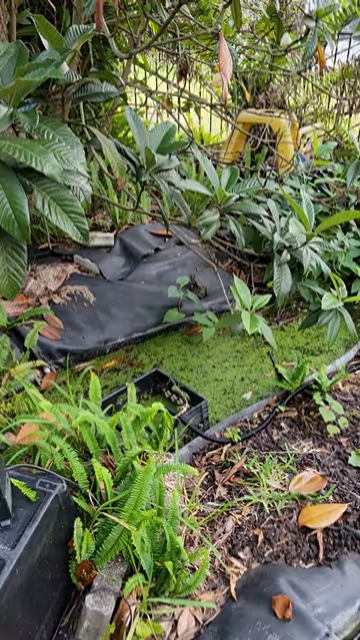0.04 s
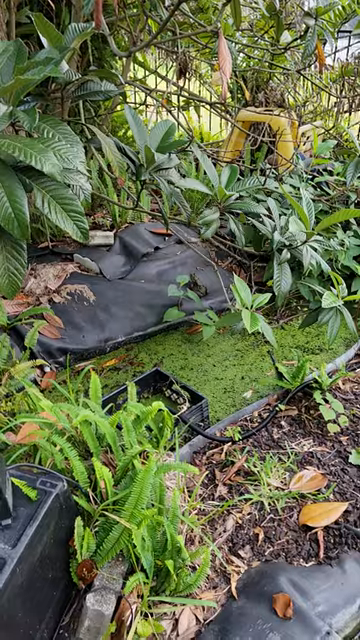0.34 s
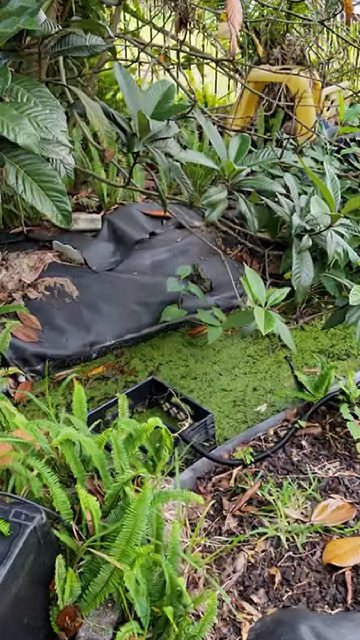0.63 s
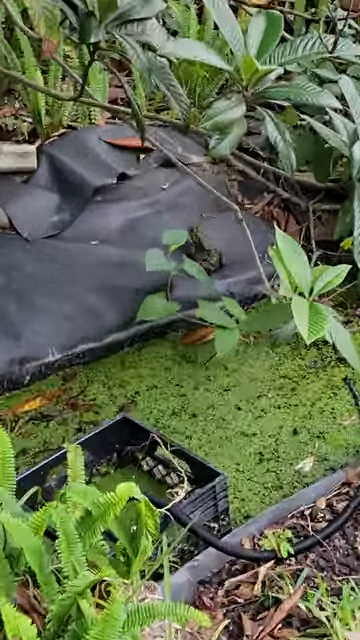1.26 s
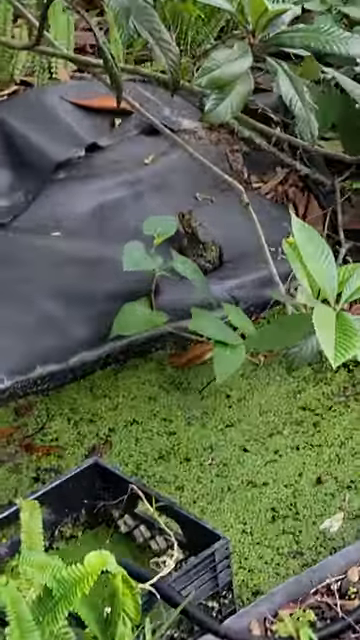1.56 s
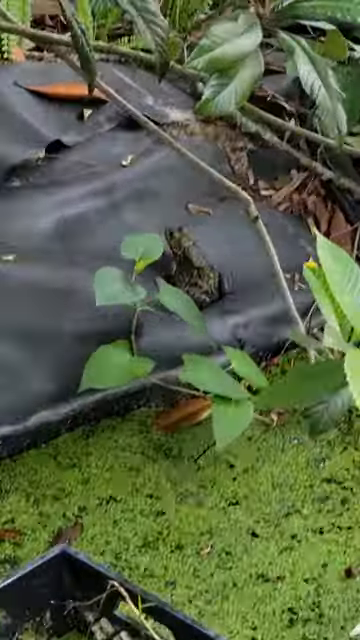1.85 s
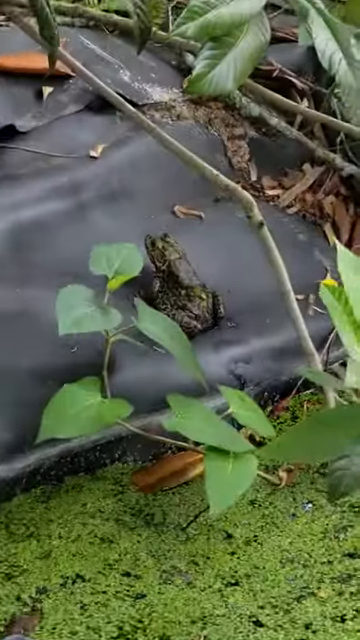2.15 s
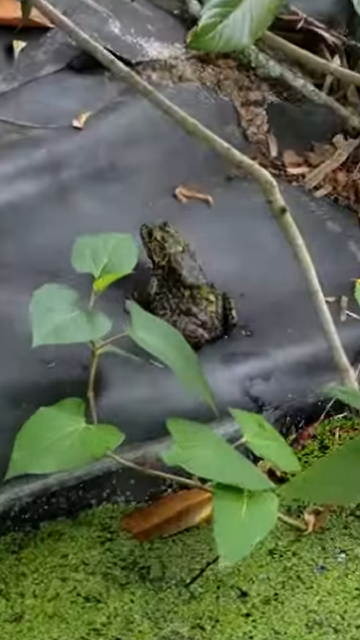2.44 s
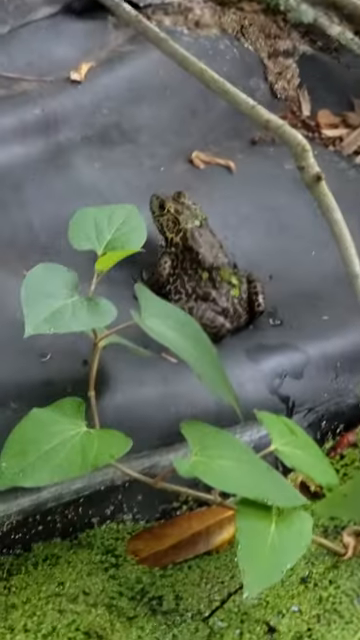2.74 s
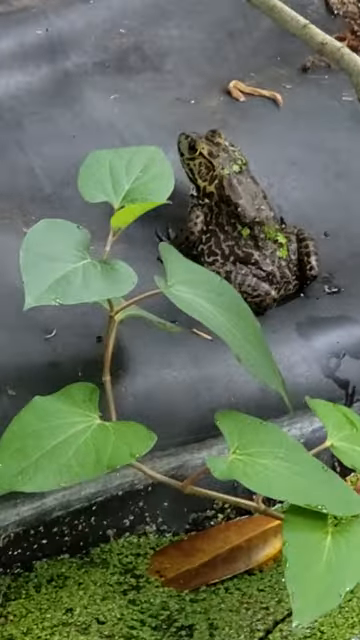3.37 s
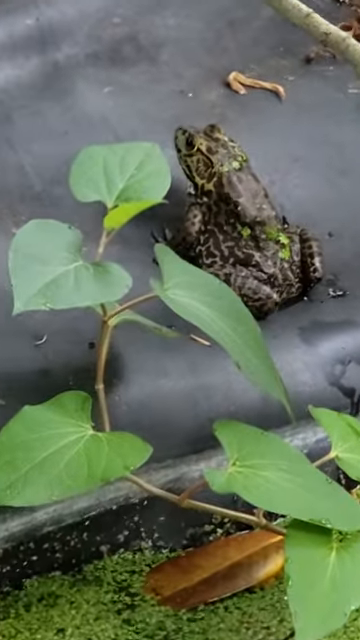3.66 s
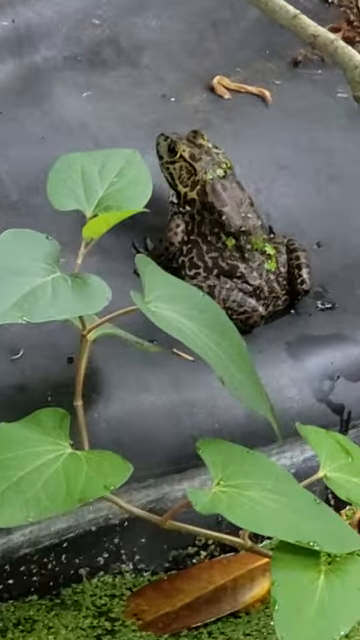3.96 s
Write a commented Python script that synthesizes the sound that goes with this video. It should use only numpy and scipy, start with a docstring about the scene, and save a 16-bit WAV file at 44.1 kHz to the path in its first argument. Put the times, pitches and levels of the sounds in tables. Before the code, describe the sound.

A steady trickle of water splashing and bubbling into a pond over a faint hum.

```python
"""Water trickles into a garden pond, heard while walking slowly closer.
Each drop splashes and traps an air bubble, which rings like a tiny bell. A plastic box and the
pond liner colour and scatter the sound, and drops rap on the box. Runs of small bubbles, spray
ticks, loud plinks and rising gurgles stand out over a pump's hum and a distant motor's drone."""
import sys
import numpy as np
from scipy import signal
from scipy.fft import rfft, irfft
from scipy.io import wavfile
from scipy.ndimage import uniform_filter1d

SR = 44100
rng = np.random.default_rng(int(sys.argv[2]) if len(sys.argv) > 2 else 0)


def int16_out(signal):
    """Quantize to a 16-bit WAV file."""
    q = np.round(np.clip(np.atleast_2d(signal).T, -1, 1) * 32767)
    wavfile.write(sys.argv[1], SR, q.astype(np.int16))


N = 176400

# How loud the water is while walking closer: time_s, bubbles_db, splashes_db, raps_db
NEARNESS = [(0, -54.5, -56.5, -56), (.25, -52.5, -53.5, -58), (.45, -58, -56, -57),
            (1.05, -51.5, -53.5, -63), (1.35, -51.5, -51.5, -51.5), (1.6, -52, -51.5, -57),
            (2.3, -51.5, -51.5, -51.5), (2.85, -46, -49, -56.5), (3.08, -54.5, -51.5, -53.5),
            (3.45, -48.5, -48.5, -52.5), (4, -49, -50.5, -51.5)]
# How wide splashes and raps sound (higher is wider): pitch_hz, width_db
SPLASH_WIDTH = [(300, 7.5), (1300, -21), (2000, -37), (3500, -9), (5500, 0.5), (8000, 0), (16000, 4)]


def undb(db):
    """Turn decibels into a number to multiply by."""
    return 10 ** (np.asarray(db) / 20)


def unit(x):
    """Scale a sound so its average power is 1."""
    return x / np.sqrt(np.mean(x ** 2))


def curve(rows, column=1):
    """Loudness over time, from one decibel column of a table."""
    rows = np.array(rows)
    return undb(np.interp(np.arange(N) / SR, rows[:, 0], rows[:, column]))


def wander(hz):
    """A smooth random drift, mostly between -1 and 1, with hz steps a second."""
    hold = int(SR / hz)
    steps = rng.standard_normal(512)[np.arange(N) // hold]
    return 1.3 * uniform_filter1d(uniform_filter1d(steps, hold), hold)


def colour(x, points):
    """Make some pitches louder and others softer, following (pitch_hz, gain_db) points."""
    hz, db = np.array(points).T
    freqs = np.arange(N + 1) * SR / (2 * N) + 1
    log_filter = irfft(np.log(undb(np.interp(np.log(freqs), np.log(hz), db))))
    log_filter[1:N] *= 2  # fold it so it rings only after a sound, never before
    log_filter[N + 1:] = 0
    return irfft(rfft(x, 2 * N) * np.exp(rfft(log_filter)))[..., :N]


def wide_noise(widths):
    """Stereo noise: one part is the same in both ears, the other is opposite."""
    a, b = rng.standard_normal((2, N))
    same = colour(a, [(hz, -10 * np.log10(1 + undb(2 * db))) for hz, db in widths])
    opposite = colour(b, [(hz, -10 * np.log10(1 + undb(-2 * db))) for hz, db in widths])
    return same + np.array([[1], [-1]]) * opposite


def add(out, start_s, sound):
    """Mix a short sound into a longer one."""
    i = int(np.clip(start_s * SR, 0, N - 1))
    out[..., i:i + sound.shape[-1]] += sound[..., :N - i]


def strength(chance, spread_db, limit):
    """Turn random numbers from 0 to 1 into drop strengths, at most limit times spread_db."""
    return undb(spread_db * np.minimum(-np.log(chance), limit))


def scatter(x, db=-7, decay_s=.014, width=.8):
    """Add quick echoes from the box and liner; width says how much the two ears differ."""
    t = np.arange(SR // 10) / SR
    noise = rng.standard_normal((3, len(t)))
    tail = (width * noise[:2] + np.sqrt(1 - width ** 2) * noise[2]) * np.exp(-t / decay_s)
    tail *= undb(db) / np.sqrt(np.sum(tail ** 2, axis=1, keepdims=True))
    tail[:, 0] = 1  # the direct sound
    return signal.fftconvolve(x * np.ones((2, 1)), tail, axes=1)


def bubble(hz, cycles, attack_s, rise=.0325):
    """A trapped bubble rings and fades, rising in pitch as it nears the surface."""
    life_s = cycles / hz
    t = np.arange(int(5 * life_s * SR)) / SR
    ring = np.sin(2 * np.pi * hz * (t + rise * t * t / life_s / 2))
    return ring * np.exp(-t / life_s) * (1 - np.exp(-(t / attack_s) ** 2))


def bubbles(drops, spot_count=14, low_hz=282.8, high_hz=6538):
    """Drops trap bubbles at several spots; small, high ones are the most common."""
    # How the box colours the bubbles: pitch_hz, gain_db
    box_tone = [(150, -26.5), (260, -12.5), (345, 11), (460, -4), (650, 3.5), (850, -15), (1150, -10.5),
                (1480, -16.5), (1720, -7.5), (1930, -1.5), (2200, -5.5), (2480, -12), (2790, -3.5),
                (3050, -4), (3330, -1.5), (3600, -12), (4150, -1.5), (4750, -19), (6200, -6), (8000, -28),
                (16000, -74)]
    spots = np.zeros((spot_count, N))
    for k, (when, chance, pitch, life, rise) in enumerate(drops):
        hz = low_hz * (high_hz / low_hz) ** (pitch ** .52)
        gain = strength(chance, spread_db=1.5, limit=5.6) * (hz / low_hz) ** .96
        ring = bubble(hz, cycles=8.93 * (.5 + life), attack_s=.00097, rise=.13 * rise)
        add(spots[k % spot_count], when * N / SR, gain * ring)
    return unit(colour(sum(scatter(spot, db=0, decay_s=.005) for spot in spots), box_tone))


def splashes(drops, crack_s=.00022, tail_s=.0094):
    """Each drop hits the water with a sharp crack and a short tail of spray."""
    # The colour of the splashes: pitch_hz, gain_db
    splash_tone = [(150, -22), (350, -18.5), (650, 7.5), (1480, -15), (1950, 2), (4100, -3.5), (4750, 4),
                   (6200, 4.5), (7350, -3.5), (8500, -4), (10000, -4.5), (12300, 2.5), (16000, -12)]
    sizes = strength(drops[:, 1], spread_db=4.4, limit=3.6)
    power = np.bincount((drops[:, 0] * N).astype(int), sizes ** 2, N)
    t = np.arange(SR // 10) / SR
    fade = np.exp(-t / crack_s) + undb(-.5) * np.exp(-t / tail_s)
    loudness = np.sqrt(np.abs(signal.fftconvolve(power, fade ** 2)[:N]))
    return unit(colour(loudness * wide_noise(SPLASH_WIDTH), splash_tone))


def fizz(spot_count=10, per_s=2300, low_hz=3450, high_hz=14980):
    """Fine droplets thrown up by the stream fall back as tiny high pings."""
    # The colour of the finest droplets: pitch_hz, gain_db
    fizz_tone = [(2500, 1), (4100, -0.5), (4750, -4), (6200, 1), (7350, 5), (8300, -14.5), (10000, -6.5),
                 (12300, 2.5), (16000, 10.5)]
    spots = np.zeros((spot_count, N))
    for k, (when, chance, pitch) in enumerate(rng.random((16384, 3))[:int(per_s * N / SR)]):
        hz = low_hz * (high_hz / low_hz) ** pitch
        ping = strength(chance, spread_db=3.2, limit=3.6) * bubble(hz, cycles=8, attack_s=1 / hz)
        add(spots[k % spot_count], when * N / SR, ping)
    return unit(colour(sum(scatter(spot, db=2, decay_s=.006, width=.85) for spot in spots), fizz_tone))


def trickle(drops_per_s=520, surge_db=1):
    """A surging stream of drops, each with a splash and a bubble, and its fine spray."""
    drops = rng.random((8192, 5))[:int(drops_per_s * N / SR)]
    ringing = bubbles(drops) * curve(NEARNESS, column=1)
    spatter = (splashes(drops) + undb(-2.5) * fizz()) * curve(NEARNESS, column=2)
    return (ringing + spatter) * undb(surge_db * wander(hz=26))


def rap_box(power, fade_s=.0072):
    """Drops break up in a few milliseconds and ring all the box's notes at once."""
    # The notes the box rings at: pitch_hz, width_hz, gain_db
    box_notes = [(349, 24, 6.5), (660, 420, 0), (1943, 253, 6), (2860, 300, 5), (3317, 135, 2.5),
                 (3930, 700, 1)]
    freqs = np.fft.rfftfreq(N, 1 / SR) + 1
    body = sum(undb(db) / (1 + 1j * (freqs - hz * hz / freqs) / width) ** 2
               for hz, width, db in box_notes)
    t = np.arange(SR // 10) / SR
    loudness = np.sqrt(np.abs(signal.fftconvolve(power, np.exp(-2 * t / fade_s))[:N]))
    bursts = loudness * unit(wide_noise(SPLASH_WIDTH))
    return irfft(rfft(bursts) * body) / np.sqrt(np.mean(np.abs(body) ** 2))


def patter(raps_per_s=200):
    """Drops rap on the box all the time, a few of them heavily."""
    # Heavy drops on the box: start_s, level_db
    heavy_drops = [(.238, -48), (0.25, -39), (0.266, -47), (0.299, -35.5), (0.324, -34.5), (0.692, -35.5),
                   (1.027, -43), (1.403, -35.5), (1.672, -34.5), (1.968, -35.5), (2.862, -33.5),
                   (3.395, -32.5), (3.412, -30), (3.516, -32), (3.696, -32), (3.795, -29.5), (3.894, -35)]
    when, chance = rng.random((4096, 2))[:int(raps_per_s * N / SR)].T
    light = np.bincount((when * N).astype(int), strength(chance, spread_db=9.5, limit=1.07) ** 2, N)
    start_s, db = np.array(heavy_drops).T
    heavy = np.bincount((start_s * SR).astype(int), undb(db - 7) ** 2, N)
    return unit(rap_box(light)) * curve(NEARNESS, column=3) + rap_box(heavy)


def motor_tone(hz):
    """One slightly unsteady tone of a running motor."""
    t = np.arange(N) / SR
    return np.sqrt(2) * np.sin(2 * np.pi * (hz * t + rng.random()) + .19 * wander(hz=3.85))


def pump_hum(waver_db=2, growth_db_per_s=1.5):
    """Mains electricity makes the pump hum; the hum wavers and slowly gets louder."""
    # The tones in the hum: pitch_hz, level_db
    hum_tones = [(120, -58.5), (180, -64.5), (300, -74), (360, -64), (420, -67), (533, -72)]
    t = np.arange(N) / SR
    hum = sum(motor_tone(hz) * undb(db + waver_db * wander(hz=5.38)) for hz, db in hum_tones)
    return hum * undb(growth_db_per_s * (t - t.mean()))


def distant_drone(throb_db=1.2):
    """A far-off motor holds one low, throbbing note that grows louder."""
    # How loud the drone is: time_s, level_db
    drone_levels = [(0, -62.5), (1.6, -57.5), (2.3, -52), (2.8, -47), (3.2, -47.5), (4, -43.5)]
    return motor_tone(hz=84.4) * curve(drone_levels) * undb(throb_db * wander(hz=11))


def outdoor_air():
    """Low outdoor rumble with a faint hiss above it."""
    # The colour of the air: pitch_hz, gain_db
    air_tone = [(10, -23), (20, -31), (28, -16), (42, -3), (57, -2), (75, -1.5), (100, -7.5), (128, -7.5),
                (155, -11.5), (240, -16.5), (350, -13), (480, -20.5), (700, -17), (1400, -24), (4000, -22),
                (9000, -45.5), (16000, -51)]
    # How loud it is: time_s, level_db
    air_levels = [(.4, -52.5), (.9, -52), (2, -48), (4, -47)]
    # How wide it sounds: pitch_hz, width_db
    air_width = [(30, -13), (90, -13.5), (200, -18), (500, -3.5), (1500, 2.5), (16000, 12)]
    return unit(colour(wide_noise(air_width), air_tone)) * curve(air_levels)


def bubble_runs(per_s=330, spread_octaves=.075, spread_db=5):
    """A pocket of air breaks into a thick run of overlapping bubbles."""
    # Runs of small bubbles of similar size: start_s, length_s, pitch_hz, level_db
    runs = [(0.174, 0.097, 2680, -57), (.18, .1, 4190, -55.5), (0.582, 0.25, 4100, -57),
            (0.933, 0.18, 4030, -57), (1.85, 0.048, 2880, -55), (3.851, 0.055, 3080, -44.5)]
    out = np.zeros((2, N))
    for start_s, length_s, centre_hz, db in runs:
        run = np.zeros(SR // 2)
        pitches = centre_hz * 2 ** (spread_octaves * rng.standard_normal(512))
        delays = rng.random(512)
        sizes = undb(spread_db * rng.standard_normal(512))
        for k, hz in enumerate(pitches[:int(length_s * per_s)]):
            add(run, (k + delays[k]) / per_s, sizes[k] * bubble(hz, cycles=7, attack_s=1 / hz))
        run *= undb(db) / np.sqrt(np.sum(run ** 2) / (length_s * SR))
        add(out, start_s, scatter(run))
    return out


def ticks(fade_s=.0051, width_octaves=.35):
    """Stray droplets land with a sharp tick."""
    # Landing droplets: start_s, level_db, pitch_hz
    droplets = [(0.2513, -37.5, 11800), (.355, -42, 10500), (.79, -45, 6400), (.848, -49, 12000),
                (.955, -43.5, 12500), (.999, -42, 12000), (1.028, -36, 5440), (1.335, -41, 7000),
                (1.7885, -35.5, 9100), (2.166, -37.5, 5970), (2.305, -38.5, 654), (2.394, -36.5, 6860),
                (2.433, -37, 5330), (2.538, -39.5, 12500), (3.494, -38, 1460), (3.775, -35.5, 5700),
                (3.964, -36, 6850)]
    out, t = np.zeros((2, N)), np.arange(SR // 10) / SR
    freqs = np.fft.rfftfreq(len(t), 1 / SR) + 1
    for start_s, db, hz in droplets:
        band = 1 / (1 + (np.log2(freqs / hz) / width_octaves) ** 2)
        hiss = unit(irfft(rfft(rng.standard_normal((2, len(t)))) * band))
        add(out, start_s, undb(db - .5) * hiss * np.exp(-t / fade_s))
    return out


def plinks(cycles=8, rise=.01, roughness=.35):
    """Single loud bubbles swell as they pinch off and die quickly, roughened by churning water."""
    # Loud bubbles: peak_s, pitch_hz, level_db
    loud_bubbles = [(.267, 4070, -34), (.267, 2760, -35.5), (.298, 644, -44), (.327, 2900, -39.5),
                    (.552, 4060, -32), (.621, 4430, -40), (.768, 4100, -36), (0.844, 4150, -39),
                    (.943, 4050, -39), (1.073, 4340, -43), (1.003, 620, -43), (1.382, 3320, -34.5),
                    (1.405, 642, -39), (1.811, 3420, -36.5), (1.8735, 1986, -25.5), (1.8765, 2780, -21.5),
                    (2.123, 4000, -37), (2.197, 3420, -35.5), (2.309, 324, -37), (2.55, 2034, -34),
                    (2.55, 3840, -30), (2.898, 3870, -33), (3.141, 1884, -31.5), (3.402, 1880, -35.5),
                    (3.416, 3800, -33), (3.652, 4080, -32.5), (3.697, 1985, -38), (3.791, 3320, -27.5),
                    (3.7915, 4100, -29.5), (3.833, 4170, -31), (3.859, 3140, -32), (3.882, 2980, -32.5),
                    (3.902, 1843, -33.5)]
    out, t = np.zeros((2, N)), np.arange(-SR // 50, SR // 20) / SR
    for peak_s, hz, db in loud_bubbles:
        life_s = min(cycles / hz, .007)
        ring = np.sin(2 * np.pi * hz * (t + rise * t * t / life_s / 2))
        ring *= np.exp(np.minimum(2 * t, -t) / life_s)  # swells twice as fast as it fades
        churn = unit(uniform_filter1d(rng.standard_normal(len(t)), int(2 * SR / hz)))
        add(out, peak_s + t[0], undb(db - 1) * scatter(ring * (1 + roughness * churn)))
    return out


def gurgles(roughness=.7, grain_s=.001):
    """Short, rough tones slide upward as a hollow in the water closes."""
    # Rising gurgles: start_s, length_s, start_hz, end_hz, level_db
    slides = [(0.376, 0.023, 1084, 1310, -55.5), (1.326, 0.019, 710, 1100, -51.5),
              (1.632, 0.0248, 1083, 1910, -47), (1.831, 0.03, 730, 1030, -47),
              (1.835, 0.012, 1490, 1850, -49), (2.495, 0.023, 870, 936, -50.5),
              (2.793, 0.018, 1550, 1690, -47.5)]
    out = np.zeros((2, N))
    for start_s, length_s, start_hz, end_hz, db in slides:
        progress = np.linspace(0, 1, int(length_s * SR))
        hz = start_hz * (end_hz / start_hz) ** progress
        tone = np.sqrt(np.abs(np.sin(np.pi * progress))) * np.sin(2 * np.pi * np.cumsum(hz) / SR)
        churn = unit(uniform_filter1d(rng.standard_normal(SR), int(grain_s * SR)))[:len(tone)]
        add(out, start_s, undb(db) * scatter(tone * (1 + roughness * churn)))
    return out


def scene():
    """Water in front of the quiet garden."""
    water = trickle() + patter() + plinks() + bubble_runs() + gurgles() + ticks()
    return water + pump_hum() + distant_drone() + outdoor_air()


def record(dry, silence_s=.069, top_hz=16000):
    """Two microphones colour the sound differently; it starts after a silence, with top treble cut."""
    # How much louder the left microphone is than the right: pitch_hz, difference_db
    balance = [(70, -1), (270, -3.5), (600, -2), (1200, -2), (2300, -0.5), (4300, -4), (6200, -2),
               (8700, 6.5), (12000, -0.5)]
    left = colour(dry[0], [(hz, db / 2) for hz, db in balance])
    right = colour(dry[1], [(hz, -db / 2) for hz, db in balance])
    heard = np.array([left, right]) * (np.arange(N) > silence_s * SR)
    return signal.sosfilt(signal.ellip(10, .2, 70, top_hz, fs=SR, output="sos"), heard)


dry = scene()
out = record(dry)
int16_out(out)
```